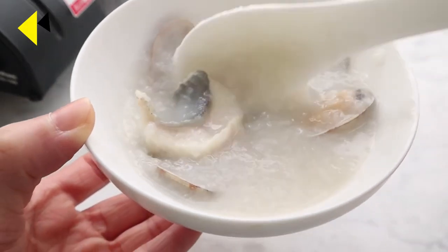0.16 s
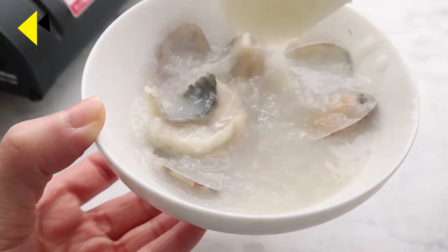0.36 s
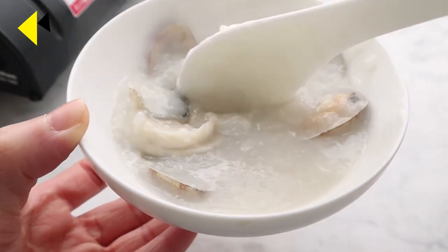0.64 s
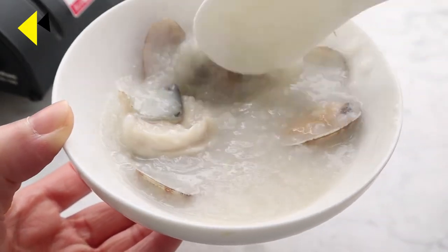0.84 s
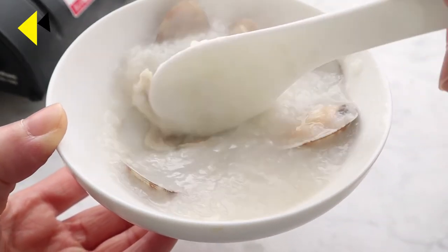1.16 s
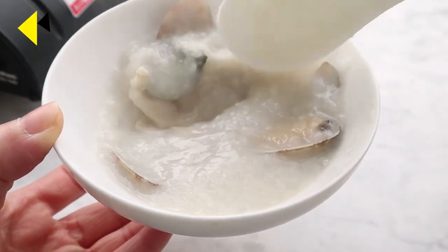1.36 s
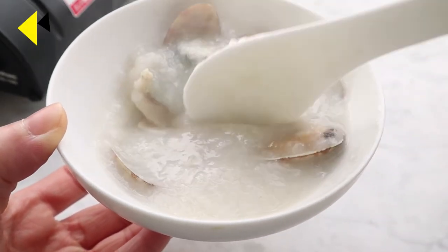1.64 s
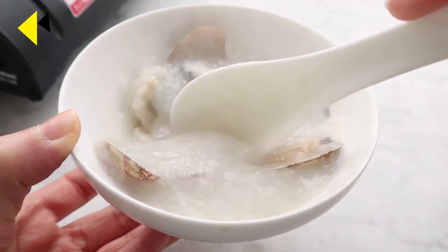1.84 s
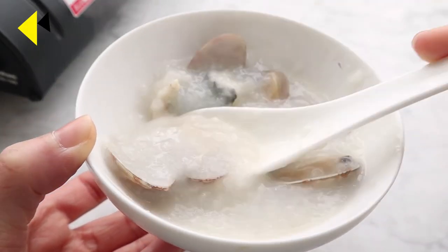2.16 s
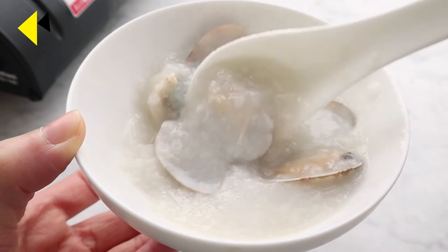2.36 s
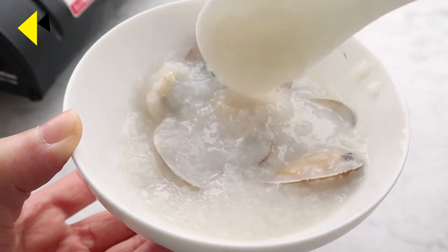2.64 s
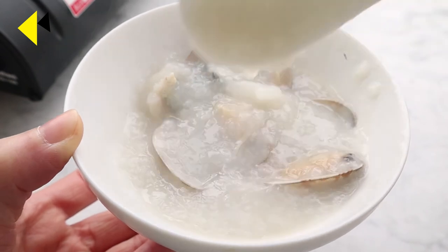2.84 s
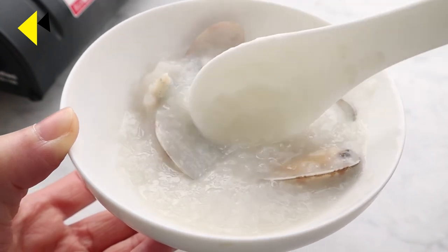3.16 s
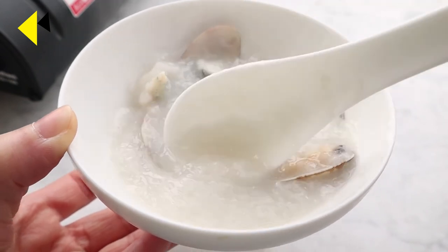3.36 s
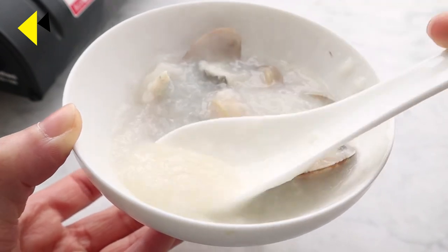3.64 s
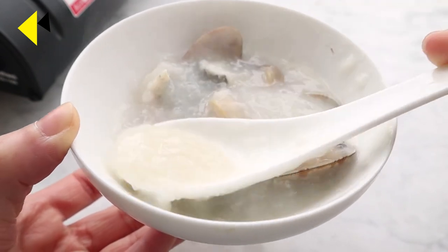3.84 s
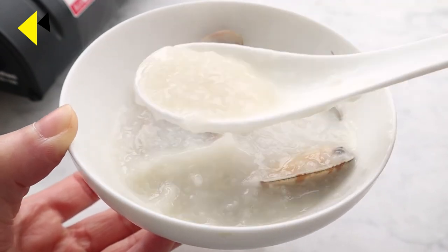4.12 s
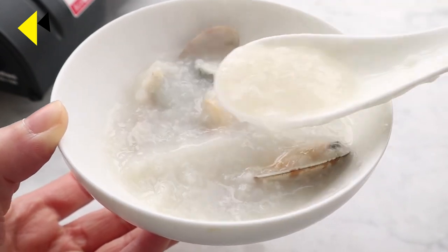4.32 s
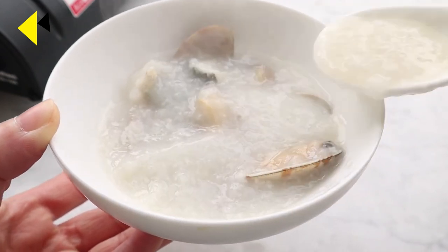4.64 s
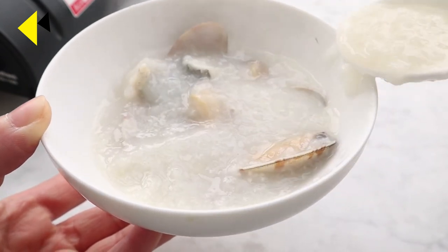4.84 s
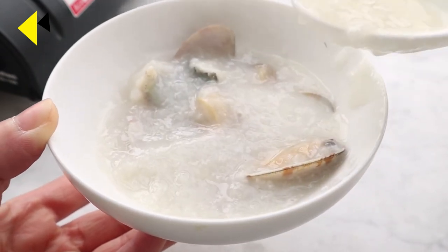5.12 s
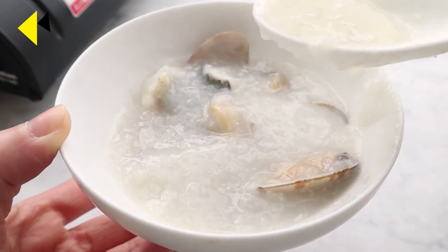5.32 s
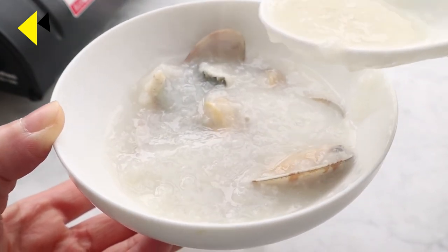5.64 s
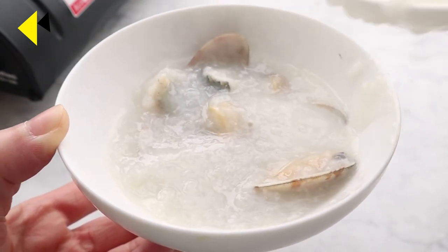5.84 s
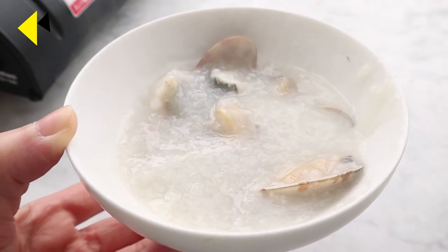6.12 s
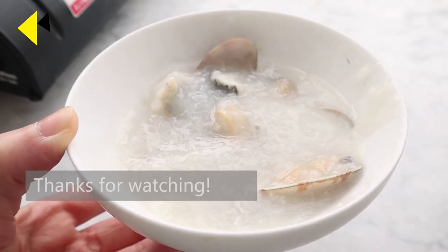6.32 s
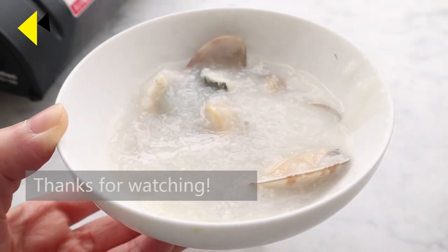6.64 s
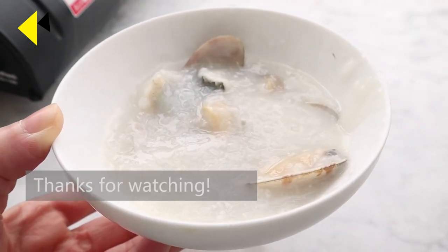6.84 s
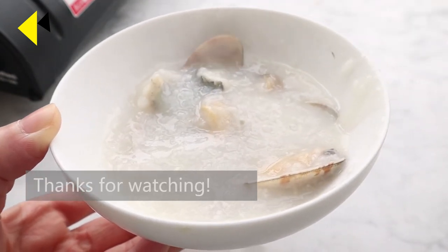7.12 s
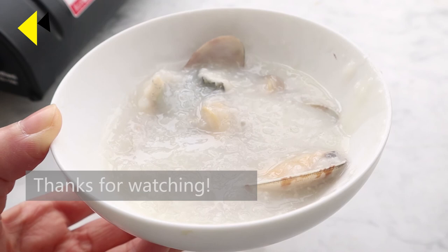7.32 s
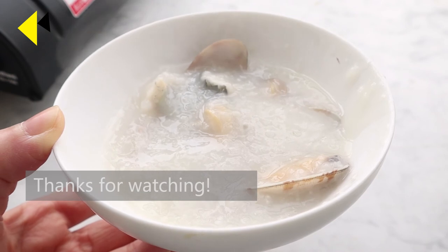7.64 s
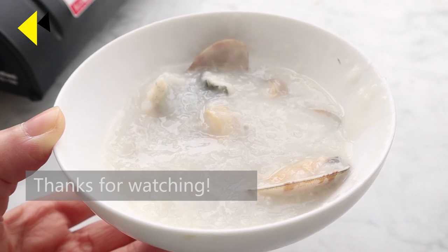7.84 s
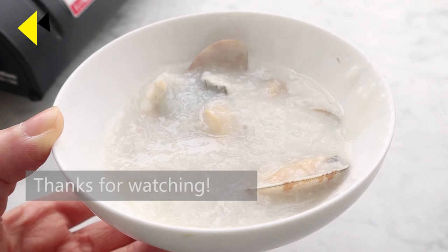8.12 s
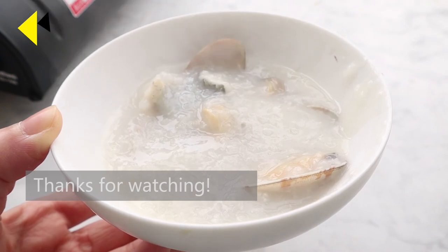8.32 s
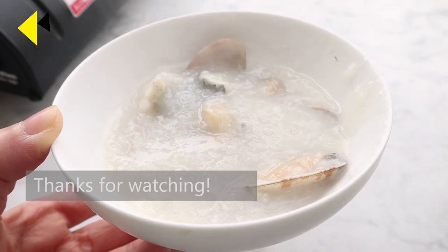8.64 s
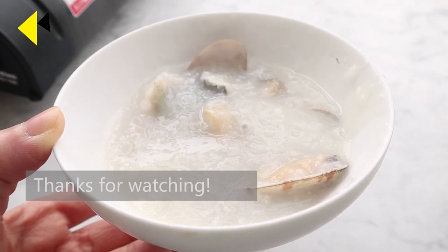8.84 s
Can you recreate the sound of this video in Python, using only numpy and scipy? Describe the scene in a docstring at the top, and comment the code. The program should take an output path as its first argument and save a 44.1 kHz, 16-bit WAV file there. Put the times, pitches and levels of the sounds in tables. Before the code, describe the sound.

Close kitchen sound of wet bubbling porridge, gritty spoon scrapes and a few sharp china clinks, over a faint low wavering drone.

```python
"""From the start thick rice porridge simmers in a steel pot: cavities plop, torn skin snaps, froth crackles.
Under it lie filtered kitchen noise and a low, wavering drone of narrow resonances.
From about half a second a china spoon stirs a bowl of porridge with clams: bands of grains scrape, ringing
modes knock on bowl and shells, skids stutter near 1.9 and 2.5 s, and loud clinks fall near 3.5 and 4.5 s.
The pot then bubbles on alone; before and after, short swells of dense clicks add bright pops and spits."""
import sys
import numpy as np
from scipy import signal
from scipy.fft import rfft, irfft
from scipy.io import wavfile
from scipy.ndimage import uniform_filter1d

SR = 44100
rng = np.random.default_rng(int(sys.argv[2]) if len(sys.argv) > 2 else 0)


def transcribe(u):
    """Save the signal u as a 16-bit wav file named by the first command-line argument.

    u: samples, shape (n,) or (channels, n), limited to [-1, 1]; the rate is SR.
    q: integer samples, one column per channel.
    """
    v = np.clip(np.atleast_2d(u).T, -1, 1)
    q = np.round(v * 32767).astype(np.int16)
    wavfile.write(sys.argv[1], SR, q)


N = 395999
TIME = np.arange(N) / SR


def from_db(db):
    """Decibels to amplitude gain."""
    return 10 ** (np.asarray(db) / 20)


def rms_one(x):
    """Scale to rms 1."""
    return x / np.sqrt(np.mean(x ** 2) + 1e-20)


def butter(x, hz, kind, order=2):
    """Causal Butterworth filter."""
    sos = signal.butter(order, np.clip(hz, 10, .47 * SR), kind, fs=SR, output="sos")
    return signal.sosfilt(sos, x + 1e-18)


def resonate(x, hz, width_hz):
    """Two-pole resonance with a gain of about 1 at its peak."""
    r = np.exp(-np.pi * width_hz / SR)
    feed = np.array([1, 0, -1]) * (1 - r * r) / 2
    feedback = [1, -2 * r * np.cos(2 * np.pi * hz / SR), r * r]
    return signal.lfilter(feed, feedback, x + 1e-18)


def drift(per_s):
    """Smooth chance of spread about 1: random points, per_s of them a second, joined by lines."""
    knots = rng.standard_normal(1 << 12)
    return np.interp(TIME * per_s, np.arange(len(knots)), knots)


def grains(per_s, spread_db):
    """Random clicks of uneven size and sign."""
    sizes = from_db(spread_db * np.minimum(rng.exponential(1, N), 4))
    signs = rng.choice([-1, 1], N)
    return sizes * signs * (rng.random(N) < per_s / SR)


def add(out, start_s, sound):
    """Mix a sound in at its start time."""
    start = max(round(start_s * SR), 0)
    out[start:start + len(sound)] += sound[:max(len(out) - start, 0)]


def swell(t, rise_s, decay_s):
    """Exponential rise to 1 at t = 0, then exponential fall."""
    return np.exp(-np.maximum(-t / rise_s, t / decay_s).clip(0, 40))


def gritty(rows, per_s, spread_db):
    """Short swells of dense tiny clicks, each swell in its own band."""
    out = np.zeros(N)
    clicks = grains(per_s, spread_db)
    for peak_s, level_db, rise_s, decay_s, centre_hz, edge_ratio in rows:
        band = rms_one(butter(clicks, [centre_hz / edge_ratio, centre_hz * edge_ratio], "band"))
        out += from_db(level_db) * swell(TIME - peak_s, rise_s, decay_s) * band
    return out


# spectrum of the still air and the burner: pitch_hz, density_db (relative, per Hz)
AIR_SPECTRUM = [(20, -26), (32, -4), (45, -20), (90, -4.5), (150, -1.5), (240, -7.5), (450, -15),
                (800, -10.5), (1400, -20.5), (2200, -20), (4200, -25), (5500, -28.5), (10000, -29.5),
                (15500, -33.5)]


def still_air(level_db=-50):
    """Steady noise of burner and room: white noise shaped by a spectrum drawn on a log-frequency axis."""
    hz, db = np.transpose(AIR_SPECTRUM)
    bins_hz = np.maximum(np.fft.rfftfreq(N, 1 / SR), 1)
    shape = from_db(np.interp(np.log(bins_hz), np.log(hz), db))
    return from_db(level_db) * rms_one(irfft(rfft(rng.standard_normal(N)) * shape, N))


# low resonances of the kitchen air: pitch_hz, width_hz (each of two passes is twice this), level_db (relative)
HUM_RESONANCES = [(40, 14.4, -12.5), (57.6, 6.8, -2), (82.3, 13.6, -9.5), (99.5, 3.3, -5),
                  (123.26, 2, -7.5)]
# course of the low drone: time_s, level_db (before trim and waver)
DRONE_COURSE = [(0.0, -51), (2.4, -50), (3.4, -46), (3.55, -49), (5.6, -55.5), (6.08, -50), (6.6, -55),
                (7.55, -48), (8.98, -50)]


def drone(trim_db=1.5, waver_db=2, wavers_per_s=5.5):
    """Noise through narrow low resonances, evened out, then given a drawn level and a chance waver."""
    hum = np.zeros(N)
    for hz, width_hz, level_db in HUM_RESONANCES:
        noise = rng.standard_normal(N + SR)
        tone = resonate(resonate(noise, hz, 2 * width_hz), hz, 2 * width_hz)
        hum += from_db(level_db) * rms_one(tone[SR:])   # skip the second of build-up
    hum = hum / np.sqrt(uniform_filter1d(hum ** 2, size=SR // 3))
    course_db = np.interp(TIME, *np.transpose(DRONE_COURSE))
    return hum * from_db(trim_db + course_db + waver_db * drift(wavers_per_s))


# kitchen reverberation: pitch_hz, t60_s, level_db
KITCHEN_BANDS = [(150, 0.14, -6), (650, 0.16, -7.5), (1500, 0.43, -12.5), (3800, 0.34, -8.5),
                 (7000, 0.37, -10), (14000, 0.36, -39)]


def kitchen(x, gap_s=0.0028, build_s=0.002):
    """Diffuse echoes that build up after a short gap and die band by band."""
    t, edges = TIME[:SR * 2 // 3], np.geomspace(100, 18000, num=12)
    hz, t60_s, level_db = np.transpose(KITCHEN_BANDS)
    response = np.zeros(len(t))
    for low, high in zip(edges, edges[1:]):
        centre = np.log(low * high) / 2
        life_s = np.interp(centre, np.log(hz), t60_s)
        band_db = np.interp(centre, np.log(hz), level_db)
        envelope = from_db(-60 * t / life_s) * np.clip((t - gap_s) / build_s, 0, 1)
        noise = butter(rng.standard_normal(len(t)), [low, high], "band")
        response += from_db(band_db) * noise * envelope / np.linalg.norm(envelope)
    return signal.fftconvolve(x, response)[:N]


# vigour of the simmer: time_s, level_db (before surges)
SIMMER_COURSE = [(0.0, -55), (0.42, -54), (1.07, -56), (1.2, -47.5), (1.77, -60.5), (1.93, -48),
                 (2.15, -57), (2.6, -48), (2.77, -58.5), (3.65, -53), (3.88, -57), (8.35, -53.5),
                 (8.55, -52), (8.98, -54)]


def vigour(surge_db=3.5, surges_per_s=7.7):
    """Drawn strength of the simmer in dB, surging by chance."""
    return np.interp(TIME, *np.transpose(SIMMER_COURSE)) + surge_db * drift(surges_per_s)


def crackle(vigour_db, level_db=-11, patch_db=2.5, patches_per_s=11):
    """Fine bright pricks that follow the vigour and come in patches."""
    pricks = rms_one(butter(butter(grains(400, 2.1), 2000, "high"), 9400, "low"))
    return pricks * from_db(vigour_db + level_db + patch_db * drift(patches_per_s))


def ticks(per_s=22, spread_db=0.0, level_db=-61, low_hz=1400, high_hz=4800):
    """Tiny blisters in the starchy skin snap one at a time."""
    return from_db(level_db) * rms_one(butter(grains(per_s, spread_db), [low_hz, high_hz], "band"))


def small_bubbles(per_s=1100, spread_db=4.0, clump_db=3, damping=0.83, low_hz=220, high_hz=1700,
                  snap_db=-11, snap_high_hz=3500):
    """Many little bursts come in clumps, each with one of a range of well damped cavities."""
    clicks = grains(per_s * from_db(clump_db * drift(25)), spread_db)
    pitches = np.geomspace(low_hz, high_hz, num=12)
    dealt = rng.integers(len(pitches), size=N)   # which cavity each click excites
    plops = np.zeros(N)
    for k, hz in enumerate(pitches):
        plops += resonate(clicks * (dealt == k), hz, damping * hz) / np.sqrt(hz)
    snaps = butter(clicks, 1270, "high", order=1)
    return rms_one(butter(rms_one(plops) + from_db(snap_db) * rms_one(snaps), snap_high_hz, "low"))


def froth(bursts, rise_s=0.006, decay_s=0.0094, growth=0.51):
    """Strength of the froth that each single bubble pushes up, breaking just before and after it."""
    power, t = np.zeros(N + SR), TIME[:SR // 5] - .1
    for start_s, level_db, _, _ in bursts:
        add(power, start_s, (from_db(growth * level_db) * swell(t, rise_s, decay_s)) ** 2)
    return np.sqrt(power[SR // 10:][:N])   # undo the 0.1 s lead


# the largest bubbles: start_s, level_db, pitch_hz (cavity as it opens), snap_db (skin, re level)
# (levels are relative: plop, snap and pot trims follow)
LARGEST_BUBBLES = [(0.031, -37, 754, -12), (0.2, -38, 534, -5), (0.222, -34.5, 646, -13),
                   (0.451, -39, 910, -5), (0.469, -26, 764, -18), (0.707, -29.5, 670, -10),
                   (0.721, -29.5, 680, -23), (1.035, -34.5, 338, -15), (1.063, -34, 790, -11),
                   (1.091, -34.5, 1040, -6), (1.142, -32, 1010, -22), (1.191, -36, 686, -21),
                   (1.3, -33.5, 343, -24), (1.509, -36, 493, -12), (1.592, -38, 360, -12),
                   (1.975, -31.5, 330, -9), (2.018, -32, 770, -20), (2.05, -32.5, 655, -24),
                   (2.704, -40, 930, -8), (2.984, -32.5, 666, -10.5), (3.068, -33, 900, -17),
                   (3.442, -34.5, 540, -15), (3.844, -42, 755, -2), (3.923, -34.5, 760, -10),
                   (4.295, -28.5, 666, -12), (4.397, -35, 656, -28), (4.481, -26, 684, -21),
                   (4.798, -37.5, 565, -4.5), (4.901, -40, 640, 2.5), (4.959, -32.5, 950, -2),
                   (5.249, -30.5, 680, -10), (5.478, -39, 643, -17), (5.647, -31, 774, -25),
                   (5.673, -25.5, 680, -5.5), (6.042, -35.5, 720, -16), (6.076, -34.5, 557, -17),
                   (6.199, -36, 834, -6.5), (6.269, -30, 685, -19), (6.303, -34.5, 700, -20),
                   (6.378, -35.5, 590, -14), (6.622, -38, 640, -10), (6.869, -41, 1390, -28),
                   (7.018, -30, 646, -6), (7.231, -34, 880, -12), (7.468, -40.5, 585, 1.5),
                   (7.571, -30, 670, -27), (7.773, -29, 620, -26), (7.788, -35, 282, -25),
                   (8.221, -36, 1530, -15), (8.423, -40, 530, -8), (8.529, -33, 503, -24),
                   (8.763, -37.5, 870, -10)]


def bubbles(count=40, stray_db=-42, stray_spread_db=2, near_s=0.024, neighbour_db=-8.5,
            pitch_hz=720, spread_octaves=0.23, skin_db=-9, skin_spread_db=4):
    """Rows for all single bubbles: the largest, a quieter neighbour close to each, and strays at any time."""
    start_s, level_db = np.transpose(LARGEST_BUBBLES)[:2]
    near = start_s + near_s * rng.uniform(-1, 1, len(start_s))
    times = np.r_[rng.uniform(0, N / SR, count), near]
    levels = np.r_[np.full(count, stray_db), level_db + neighbour_db]
    size, pitch, skin = rng.standard_normal((len(times), 3)).clip(-2, 2).T
    lesser = np.c_[times, levels + stray_spread_db * size,
                   pitch_hz * 2 ** (spread_octaves * pitch), skin_db + skin_spread_db * skin]
    return np.vstack([LARGEST_BUBBLES, lesser])


def big_bubbles(bursts, cycles=3.2, glide=0.069, plop_db=8, snap_db=7, snap_t60_s=0.019,
                snap_low_hz=1100, snap_high_hz=4500):
    """The skin tears with a snap; the opened cavity rings a few cycles, at first rising in pitch."""
    out, t = np.zeros(N), TIME[:SR // 25]
    for start_s, level_db, hz, skin_db in bursts:
        age = t * hz / cycles
        ring = -np.sin(2 * np.pi * hz * t * (1 + glide * np.minimum(age, 1)))
        plop = ring * from_db(-30 * age) * (1 - np.exp(-4 * t * hz))   # soft onset
        tear = rng.standard_normal(len(t)) * from_db(-60 * t / snap_t60_s)
        snap = butter(butter(tear, snap_low_hz, "high", order=1), snap_high_hz, "low")
        burst = from_db(plop_db) * plop + 2 * from_db(skin_db + snap_db) * snap
        add(out, start_s, from_db(level_db) * burst)
    return out


# hollow of the pot above the porridge: pitch_hz, width_hz, level_db (re the direct boil)
POT_HOLLOW = [(230, 115, 4), (590, 50, 2), (880, 275, -2), (1305, 90, 7.5), (2730, 31, 4.5),
              (3360, 47, 4.5), (4050, 180, -2)]


def pot(bubbles_db=-1, froth_db=-24, open_db=-3):
    """All the bubbling, coloured by the hollow; one vigour drives the small bubbles and the crackle."""
    bursts, vigour_db = bubbles(), vigour()
    activity = np.hypot(from_db(vigour_db + bubbles_db), from_db(froth_db) * froth(bursts))
    boil = big_bubbles(bursts) + ticks() + activity * small_bubbles() + crackle(vigour_db)
    hollow = sum(from_db(db) * resonate(boil, hz, width_hz) for hz, width_hz, db in POT_HOLLOW)
    return from_db(open_db) * (boil + hollow)


# bright pops and spits from the pot: peak_s, level_db, rise_s, decay_s (to 1/e), centre_hz, edge_ratio
BRIGHT_POPS_AND_SPITS = [(.824, -48, .002, 0.0065, 3380, 1.4), (5.136, -42.5, .001, 0.0045, 3970, 1.25),
                         (5.674, -22, 0.0008, 0.001, 7200, 1.28), (5.678, -38.5, 0.0056, 0.031, 7000, 1.32),
                         (6.365, -42, .002, 0.0061, 3900, 1.2), (6.669, -46, .002, 0.0027, 4670, 1.1),
                         (7.019, -44, 0.0024, 0.015, 7000, 1.6), (7.743, -46, .001, 0.0027, 5500, 1.2),
                         (8.2205, -25, 0.00049, 0.0012, 1730, 1.28)]


def bright_pops_and_spits():
    """Bright pops and spits from the pot: very dense clicks in short swells."""
    return gritty(BRIGHT_POPS_AND_SPITS, per_s=27000, spread_db=0.0)


# spoon dragged over china and through grains: peak_s, level_db, rise_s, decay_s (to 1/e), centre_hz, edge_ratio
SPOON_RASPS = [(.465, -49.5, 0.0066, 0.007, 2500, 4.5), (.748, -37.5, 0.037, 0.02, 2010, 1.6),
               (.755, -47.5, 0.028, 0.017, 7000, 1.26), (1.03, -48.5, .005, 0.019, 7000, 1.4),
               (1.848, -35.5, 0.0089, 0.032, 1280, 1.17), (1.885, -41, 0.017, 0.033, 1550, 1.07),
               (1.93, -33.5, 0.01, 0.012, 3350, 1.44), (3.22, -47.5, 0.021, 0.017, 3400, 1.8),
               (3.512, -44, 0.0039, 0.009, 6000, 2.1)]


def scrapes():
    """The dragged spoon catches on grain after grain: uneven clicks in short swells."""
    return gritty(SPOON_RASPS, per_s=2900, spread_db=2.0)


# bowl and shells, deadened by the porridge: pitch_hz, level_db (typical, relative), t60_s
BOWL_MODES = [(900, -21, 0.0089), (1084, -22, 0.019), (1338, -4.5, 0.0093), (1620, -3, 0.0094),
              (1865, -1.5, 0.0044), (2500, -11, 0.01), (2830, -10.5, 0.0078), (3620, 0.5, 0.0044),
              (3763, -9.5, 0.022), (4370, -11, 0.0075), (5370, -13, 0.0039), (5910, -11, 0.0083),
              (7000, -26, 0.028), (10650, -5.5, 0.003)]


def bowl_knock(t, click_db=9, crack_db=-8, crack_t60_s=.011, wash_db=-24, wash_t60_s=0.14,
               crack_low_hz=750, crack_high_hz=11000):
    """Short modes of the bowl, struck unevenly, with a click, a crack and a faint wash of noise."""
    knock = np.zeros(len(t))
    for k, (hz, level_db, t60_s) in enumerate(BOWL_MODES):
        strength = from_db(rng.standard_normal()) * (-1) ** k
        knock += strength * from_db(level_db - 60 * t / t60_s) * np.sin(2 * np.pi * hz * t)
    click = from_db(click_db) * (t == 0)   # a single sample
    rough = from_db(crack_db - 60 * t / crack_t60_s) + from_db(wash_db - 60 * t / wash_t60_s)
    attack = click + rng.standard_normal(len(t)) * rough
    return knock + butter(butter(attack, crack_low_hz, "high"), crack_high_hz, "low")


# bending modes of the spoon: pitch_hz (lifted), level_db (lifted, relative), t60_s (lifted), dipped_change_db
SPOON_MODES = [(1748.5, -10, 0.2, 3), (4180, -23.5, 0.45, 8), (4235, -11, 0.12, 4.5), (7496, -1, 0.048, -5),
               (9700, -21, 0.036, -17), (11100, -10.5, 0.03, -5)]


def spoon_ring(t, dipped, detune=0.0077, damping=0.52):
    """Decaying bending modes; porridge on a dipped spoon lowers, shortens and dulls them."""
    ring = np.zeros(len(t))
    for hz, level_db, t60_s, dip_db in SPOON_MODES:
        fade = from_db(level_db + dipped * dip_db - 60 * t / (t60_s * damping ** dipped))
        ring += fade * np.sin(2 * np.pi * hz * (1 - detune * dipped) * t)
    return ring


# stick-slip skids: start_s, slips (count), first_gap_s, level_db (first slip, before unevenness),
# spot_hz, hardness_hz, ring_db (re level), room_db (re direct)
SPOON_SKIDS = [(1.9177, 7, .0044, -24.5, 3130, 8300, -12.5, -2.5),
               (2.528, 3, .0071, -23, 1420, 2360, -14, -11), (2.567, 5, .0039, -18, 1430, 5350, -20, -6)]


def slips(slowing=1.1, loss_db=1.06, uneven_db=2.5):
    """The sticking, slipping spoon slows: gaps widen, knocks tend to weaken; gives rows like SPOON_CONTACTS."""
    rows = []
    for start_s, count, gap_s, level_db, *colour in SPOON_SKIDS:
        for k in range(round(count)):
            slip_db = level_db - loss_db * k + uneven_db * rng.standard_normal()
            rows.append((start_s, slip_db, *colour))
            start_s = start_s + gap_s * slowing ** k
    return rows


# single knocks of the spoon on bowl and shells: start_s, level_db (relative),
# spot_hz (favoured by the struck spot), hardness_hz (treble limit), ring_db (spoon, re level), room_db (re direct)
SPOON_CONTACTS = [ (0.7419, -27, 1550, 7000, -6, -2), (1.0906, -33, 1350, 5000, -13, -13),
                  (1.2419, -20, 1500, 3360, -18, -1.5), (1.3435, -30.5, 3800, 3980, -7, -8),
                  (1.429, -30.5, 4000, 4340, -8, -17), (1.747, -7, 1400, 10700, -17.5, 1.5),
                  (1.8175, -22.5, 1390, 8000, -18, -6), (1.9087, -23, 3400, 7000, -23, -2),
                  (1.9918, -29, 3600, 5000, -15, -12), (2.066, -29.5, 1790, 9000, -10, -2),
                  (2.2163, -28, 1600, 4250, -8, -20), (3.1025, -19.5, 12000, 19000, -14, -12),
                  (3.1041, -19.5, 1500, 18000, -13.5, -2.5), (3.3496, -25, 3500, 14000, -16, -2.5),
                  (3.3728, -34.5, 7000, 11000, -7, -10), (3.509, -29.5, 3080, 10000, 0.5, -3),
                  (3.5374, -3, 2920, 10200, -5, 4.5), (3.5455, -12.5, 3500, 9000, -3, -25),
                  (4.4959, -1.5, 2500, 7200, -4.5, -2), (4.5134, -12.5, 2560, 9000, -4.5, -4)]


def spoon(lifted_s=4.0, spot_db=4, spot_width=0.53):
    """Each contact knocks the bowl and rings the spoon; gives the direct sound and what goes into the room."""
    direct, to_room, t = np.zeros(N), np.zeros(N), TIME[:SR // 3]
    for start_s, level_db, spot_hz, hardness_hz, ring_db, room_db in [*SPOON_CONTACTS, *slips()]:
        dipped = start_s < lifted_s
        hit = bowl_knock(t) + from_db(ring_db) * spoon_ring(t, dipped)
        hit = hit + from_db(spot_db) * resonate(hit, spot_hz, spot_width * spot_hz)
        # a softer contact leaves out the treble
        hit = from_db(level_db) * butter(hit, hardness_hz, "low")
        add(direct, start_s, hit)
        add(to_room, start_s, from_db(room_db) * hit)
    return direct, to_room


def scene(pot_room_db=1, spoon_room_db=0):
    """Pot and bowl share one kitchen; the pot sends a little more into it, as if farther off."""
    background = still_air() + drone()
    boil = pot() + bright_pops_and_spits()
    rasps = scrapes()
    knocks, knocks_to_room = spoon()
    echoes = kitchen(from_db(pot_room_db) * boil + from_db(spoon_room_db) * (knocks_to_room + rasps))
    return (background + echoes + boil + rasps + knocks)[None]


def record(dry, cutoff_hz=15870):
    """Peaks beyond full scale overload and flatten; a steep filter then cuts the top."""
    clipped = np.clip(dry, -1, 1)
    return signal.sosfilt(signal.ellip(16, .1, 80, cutoff_hz, fs=SR, output="sos"), clipped)


dry = scene()
out = record(dry)
transcribe(out)
```